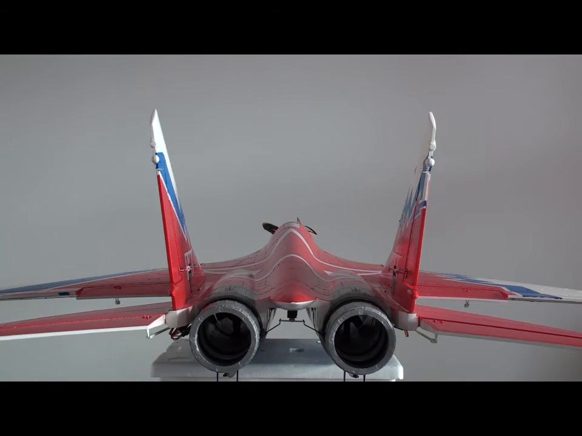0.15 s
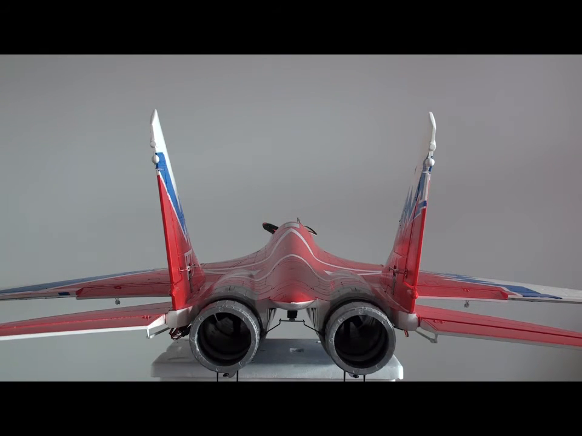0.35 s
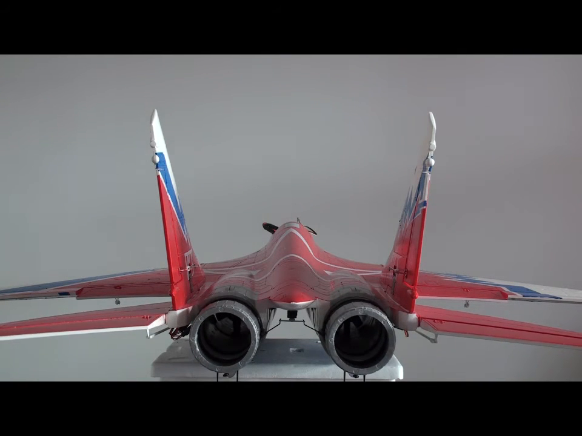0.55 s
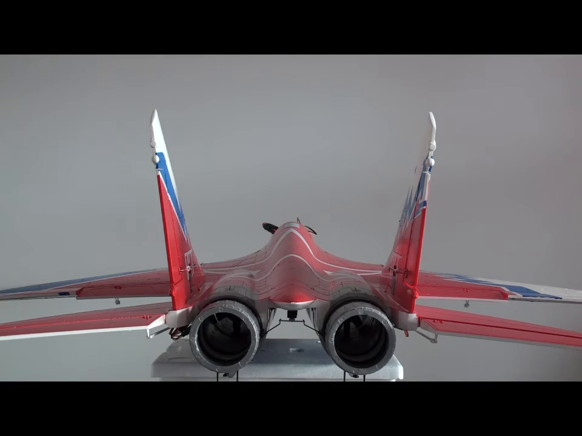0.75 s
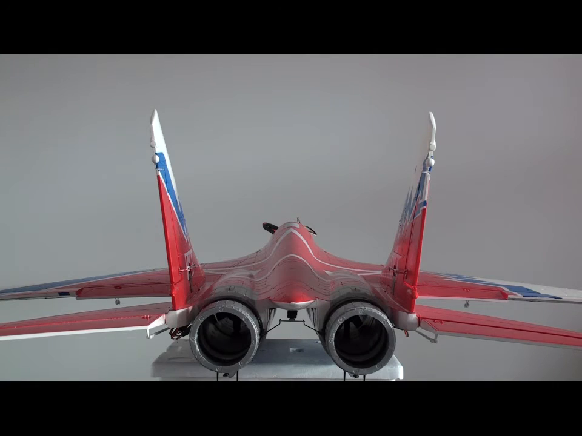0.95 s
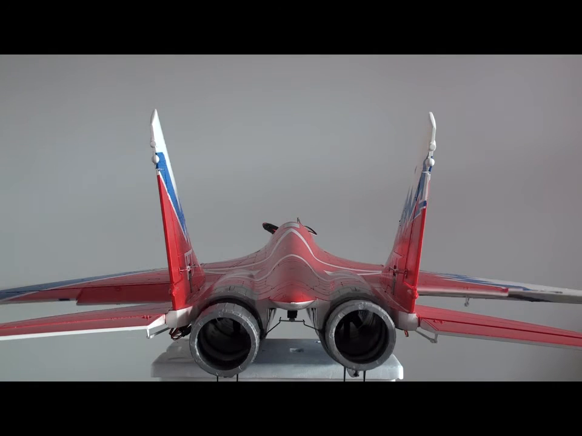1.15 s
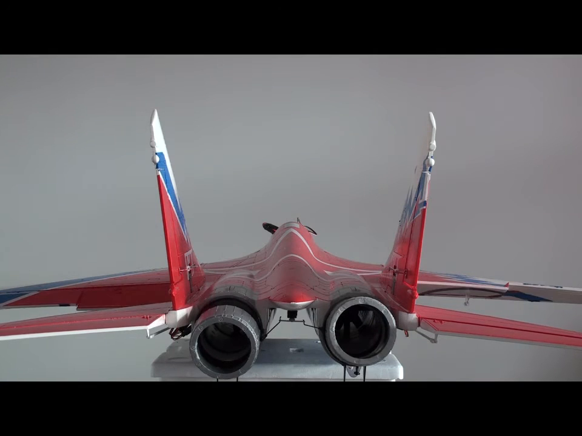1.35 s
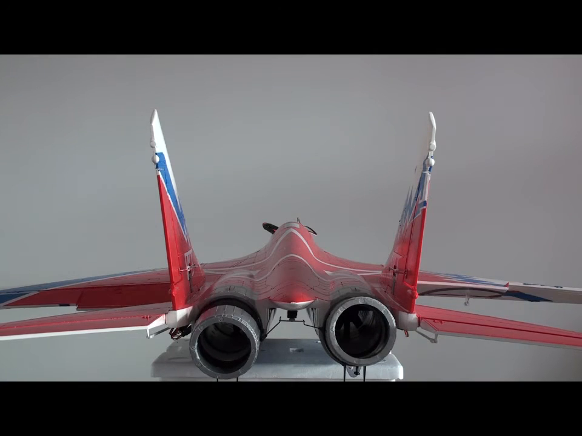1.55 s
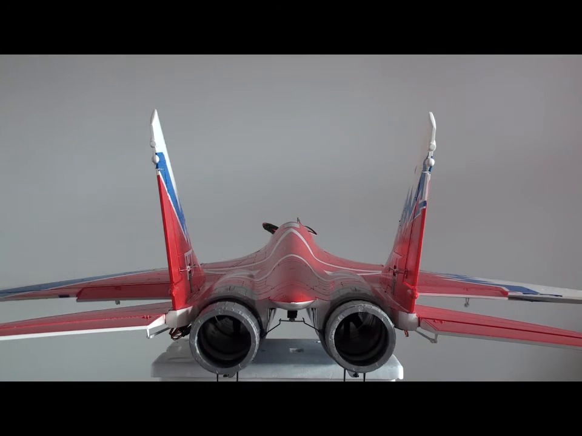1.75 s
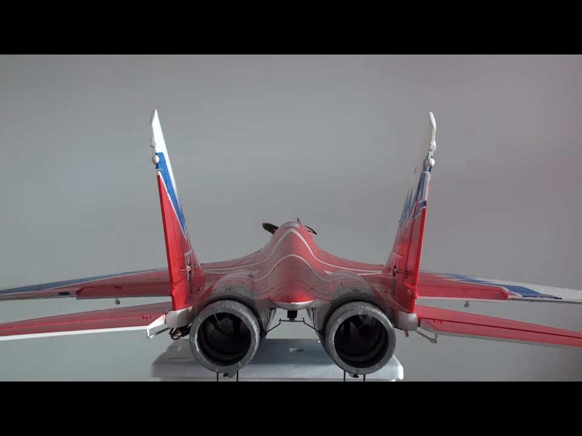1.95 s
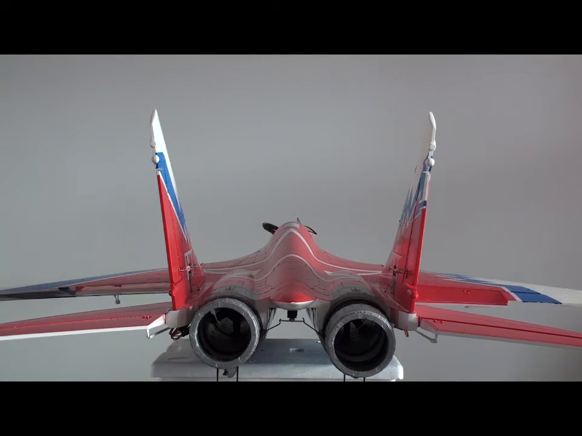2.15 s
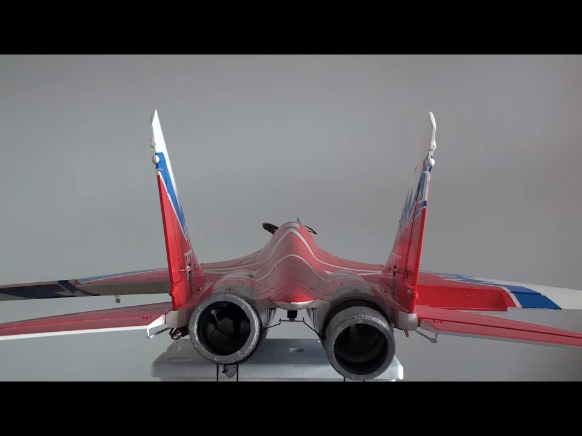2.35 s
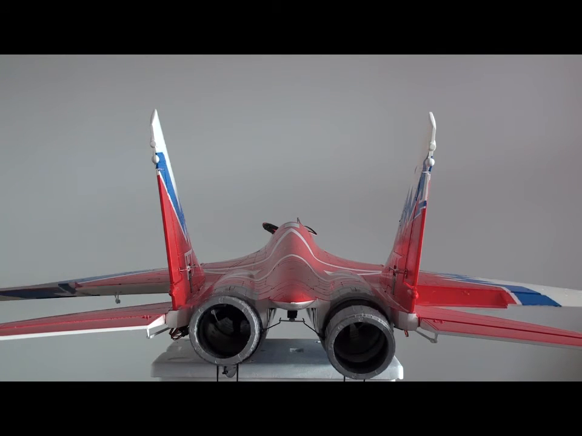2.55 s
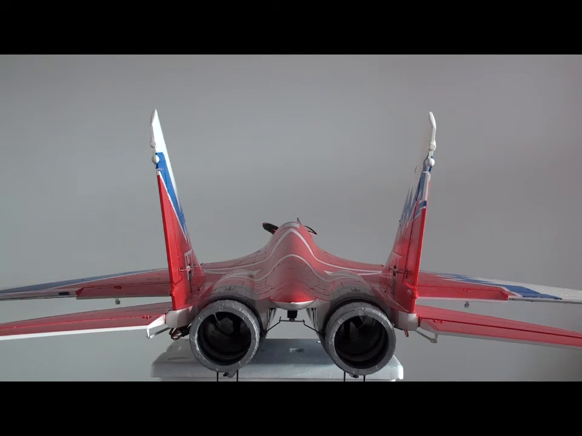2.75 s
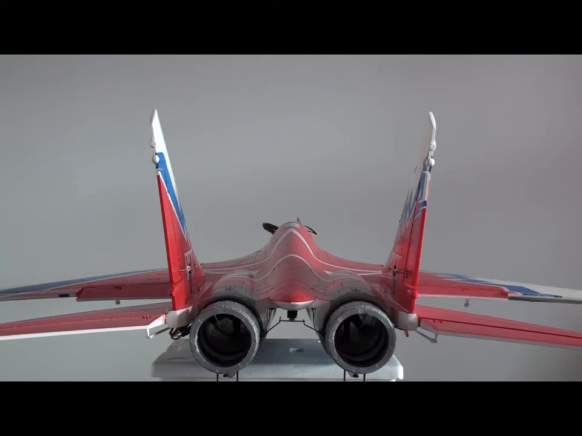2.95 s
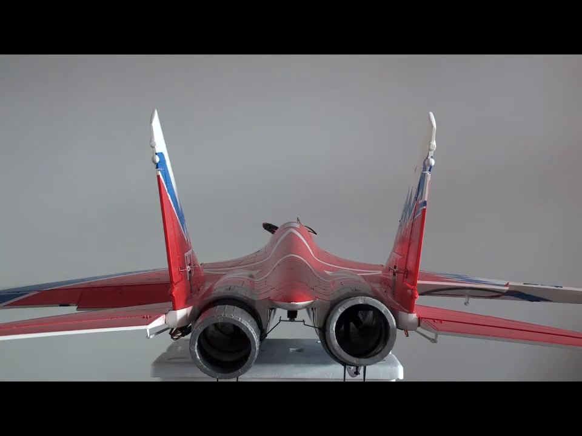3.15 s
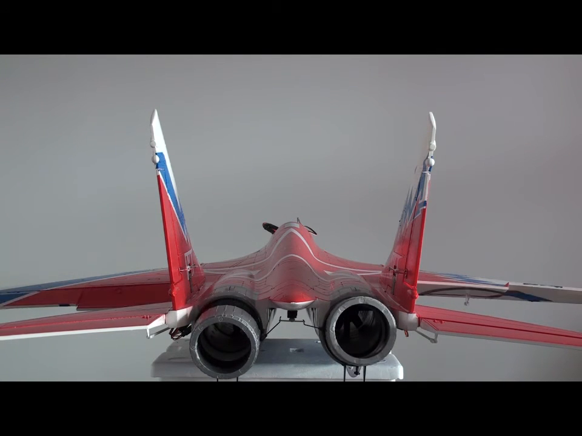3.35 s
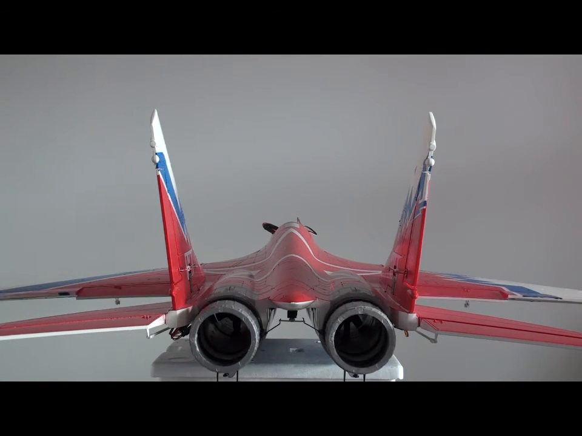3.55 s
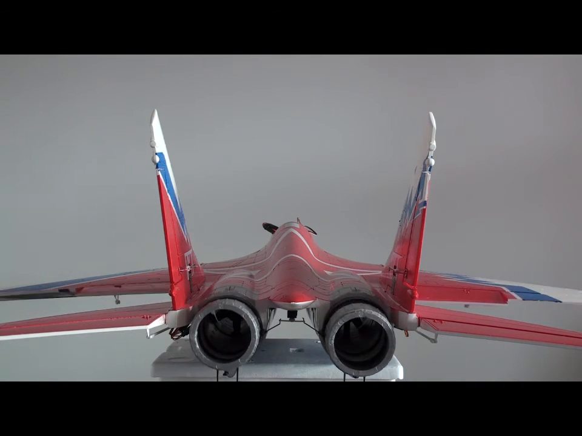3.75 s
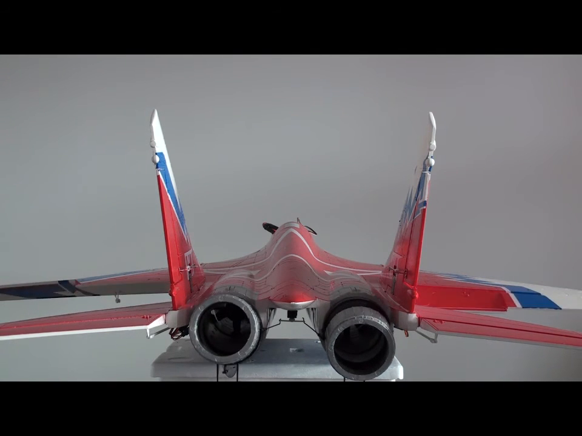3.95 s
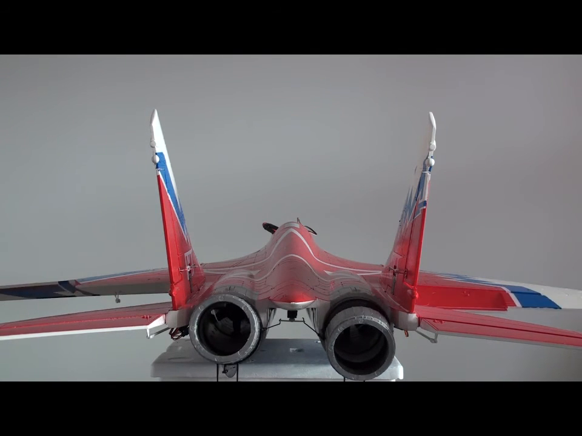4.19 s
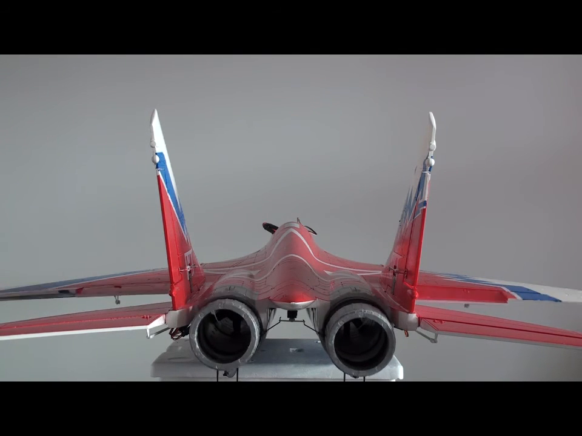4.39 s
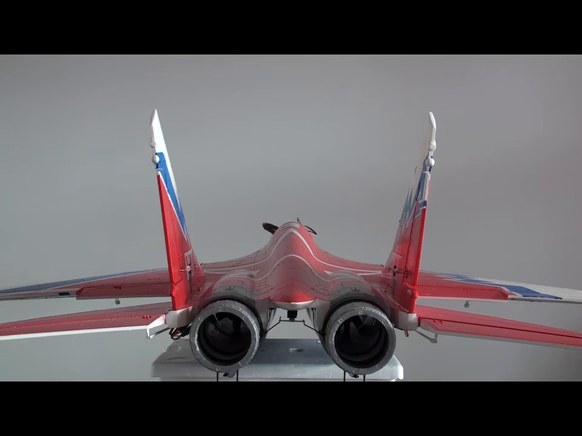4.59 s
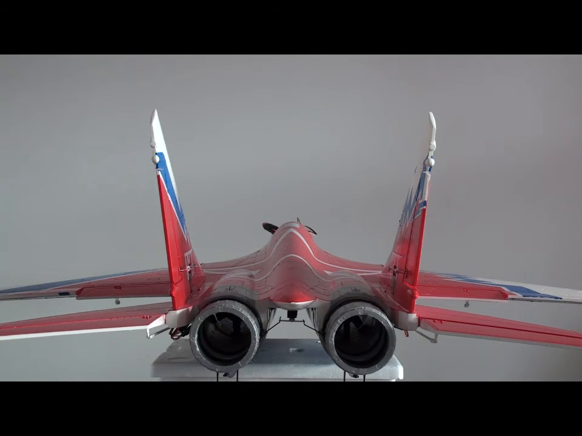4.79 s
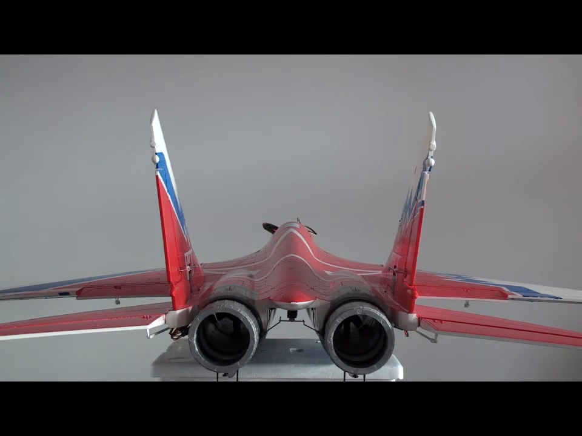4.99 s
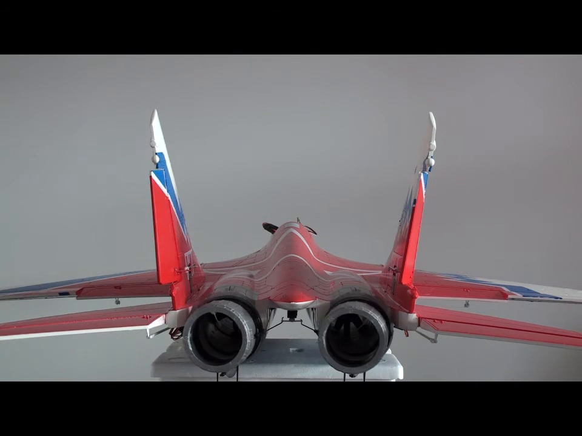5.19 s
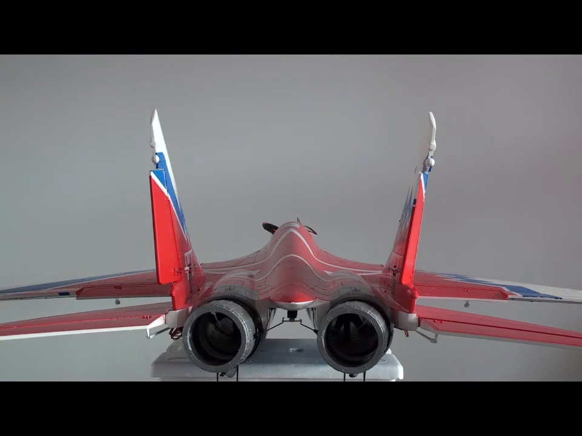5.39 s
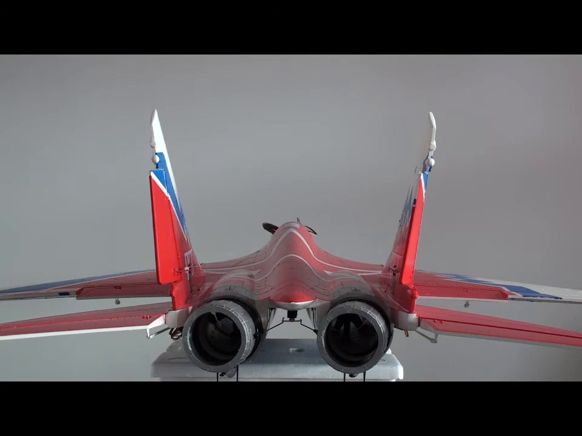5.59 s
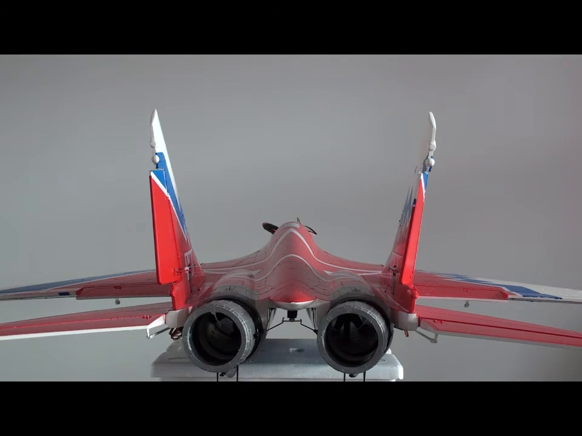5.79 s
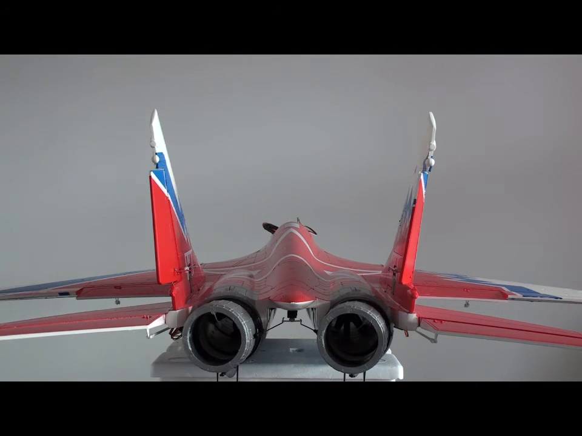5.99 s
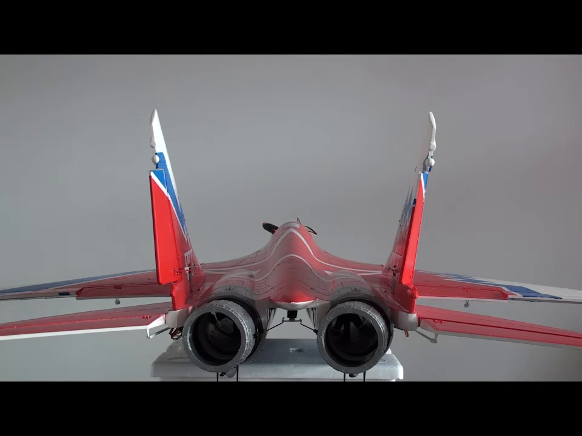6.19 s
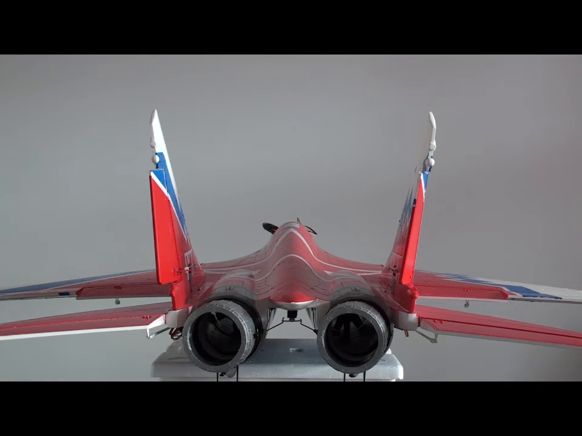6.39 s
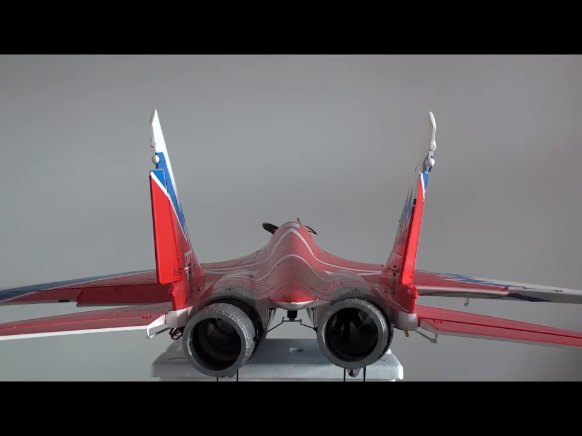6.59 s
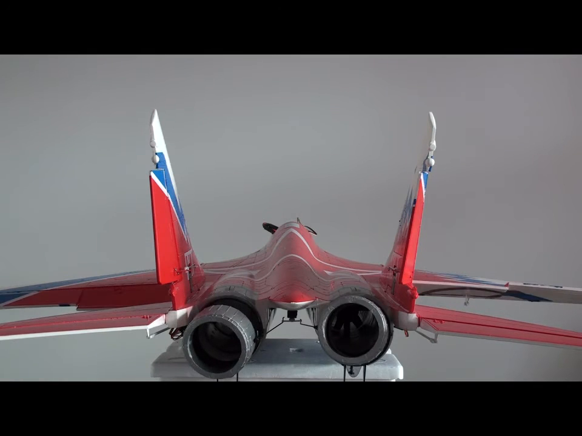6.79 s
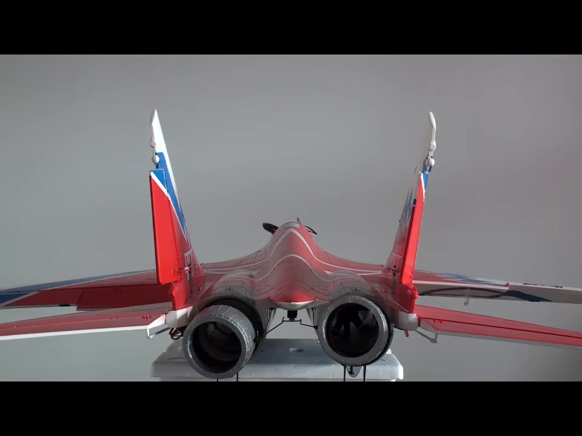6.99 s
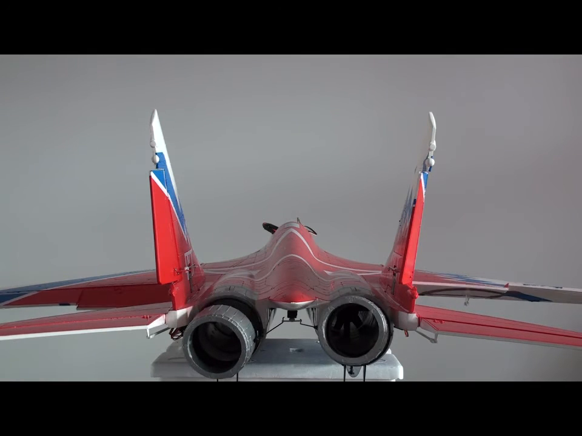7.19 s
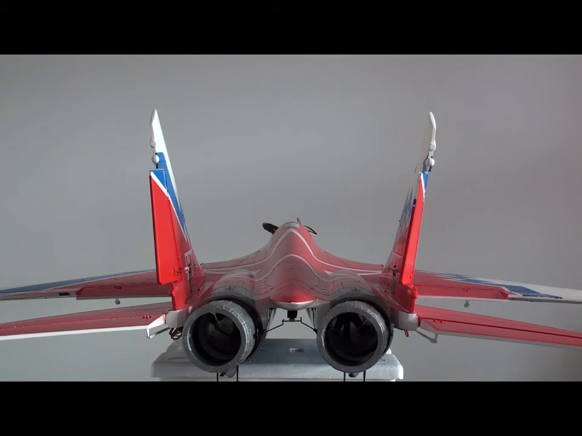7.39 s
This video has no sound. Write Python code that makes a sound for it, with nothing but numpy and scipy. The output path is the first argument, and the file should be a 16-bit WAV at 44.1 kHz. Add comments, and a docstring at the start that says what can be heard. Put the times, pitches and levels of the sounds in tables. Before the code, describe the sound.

The servos of a model jet are heard close and centered in a small room, with a short echo and faint background noise. For the first second they give a soft, crackly buzz that stops and starts, with tiny gear ticks. From about 1.1 to 4.7 seconds they whir in a dozen or so short, raspy strokes as the control surfaces swing. Each opens with a light tick, swells and quickly fades; the strongest come near 1.4, 3.2 and 3.6 seconds. The faint buzz continues in the gaps. Around 5 seconds the rudders twitch twice, then swing with a softer whir, and the hollow tail gives three faint, dull knocks. From about 5.4 to 6.5 seconds only the fitful buzz and a few ticks remain. Two strong whirs run together from 6.6 to 6.9 seconds, followed by more buzzing and a last short stroke with a click near 7.4 seconds.

```python
"""In a small room, the servos of a model jet buzz in fits as they hold its surfaces against their weight.
Loaded gears tick in their play. From about 1 s the tail planes, ailerons and nozzles swing: each stroke
opens with a tick of backlash, then a rush of gear-tooth impacts excites the hollow airframe's resonances.
Near 5 s the rudders twitch, jerk and swing, and the tail answers with dull knocks.
The holding buzz returns, broken by three last strokes."""
import sys
import numpy as np
from scipy import signal
from scipy.fft import rfft, irfft, next_fast_len
from scipy.io import wavfile

SR = 44100
rng = np.random.default_rng(int(sys.argv[2]) if len(sys.argv) > 2 else 0)


def to_wav(s):
    """Save 16-bit WAV."""
    ch = np.atleast_2d(s).T  # columns
    pcm = np.round(np.clip(ch, -1, 1) * 32767)  # PCM
    wavfile.write(sys.argv[1], SR, pcm.astype(np.int16))


N = 328104
TIME = np.arange(N) / SR


def from_db(db):
    """Amplitude grows tenfold for every 20 dB."""
    return 10 ** (np.asarray(db) / 20)


def rms_one(x):
    """Normalisation to unit mean power."""
    return x / np.sqrt(np.mean(x ** 2) + 1e-20)


def drift(rate_hz):
    """Low-passed Gaussian noise: a smooth fluctuation of unit rms."""
    step, settle = 40, 2000
    pole = np.exp(-2 * np.pi * step * rate_hz / SR)
    noise = rng.standard_normal(N // step + settle + 2)
    slow = signal.lfilter([1], [1, -2 * pole, pole * pole], noise)[settle:]
    return np.interp(np.arange(N) / step, np.arange(len(slow)), rms_one(slow))


def colour(x, points):
    """Zero-phase filtering by a curve of (frequency [Hz], gain [dB])."""
    size = next_fast_len(N + SR // 10)
    hz, db = np.transpose(points)
    bins = np.maximum(np.fft.rfftfreq(size, 1 / SR), 1)
    gain = from_db(np.interp(np.log(bins), np.log(hz), db))
    return irfft(rfft(x, size) * gain, size)[..., :N]


def cut(x, hz, kind, order=4):
    """Butterworth filtering: a maximally flat passband."""
    return signal.sosfilt(signal.butter(order, hz, kind, fs=SR, output="sos"), x)


def resonate(x, peaks):
    """Resonance: each mode scales its own band, and rings longer the narrower it is."""
    out = x
    for hz, width_hz, gain_db in peaks:
        radius = np.exp(-np.pi * width_hz / SR)
        poles = [1, -2 * radius * np.cos(2 * np.pi * hz / SR), radius ** 2]
        band = signal.lfilter(np.array([1, 0, -1]) * (1 - radius ** 2) / 2, poles, x + 1e-18)
        out = out + (from_db(gain_db) - 1) * band
    return out


def decay(impulses, ring_s):
    """Damping: each impulse dies away exponentially."""
    return signal.lfilter([1], [1, -np.exp(-1 / (ring_s * SR))], impulses + 1e-18)


def contacts(rate_hz, uneven_db, chance_db, teeth):
    """Gear meshing: one impact per tooth, in a pattern of strengths that recurs with each turn."""
    phase = np.cumsum(rate_hz) / SR + rng.random()
    tooth = phase.astype(int)
    at = np.flatnonzero(np.diff(tooth))
    tooth_db = uneven_db * rng.standard_normal(teeth)[tooth[at] % teeth]
    scatter_db = chance_db * np.clip(rng.standard_normal(len(at)), -2, 2)
    strength = rms_one(from_db(tooth_db + scatter_db)) / np.sqrt(rate_hz[at] / SR)
    late = (tooth[at + 1] - phase[at]) / (phase[at + 1] - phase[at])   # fraction of a sample
    out = np.zeros(N)
    out[at] += strength * (1 - late)
    out[at + 1] += strength * late
    return out


def rattle(clicks, ring_s):
    """Chatter of loose teeth: the energy of each impact decays as noise."""
    return rms_one(np.sqrt(decay(clicks ** 2, ring_s)) * rng.standard_normal(N))


def shell_path(bounce=0.66, stages=3, size=4096):
    """Allpass dispersion: short echoes in the shell smear a click without colouring it."""
    response = 1
    for lag in rng.integers(20, 170, stages):
        delay = np.exp(-2j * np.pi * np.fft.rfftfreq(size) * lag)
        response = response * (delay - bounce) / (1 - bounce * delay)
    return irfft(response)


def airframe(x, side_lag_s=.002):
    """Multipath transmission through the shell: one path to the mid, a later one to the side."""
    ahead = signal.oaconvolve(x, shell_path())[:N]
    sideways = signal.oaconvolve(np.roll(x, round(side_lag_s * SR)), shell_path())[:N]
    return rms_one(np.array([ahead, sideways]))


# Fits of holding buzz: (time [s], duration [s], level [dB])
BUZZ_FITS = [(0, .15, -49), (.227, 0.064, -50), (0.338, 0.2, -49), (.577, 0.23, -51), (0.824, .045, -48.5),
             (.92, 0.022, -53), (0.998, 0.058, -50), (1.44, .2, -49), (2.055, .05, -46),
             (2.546, 0.091, -52), (3.41, .1, -49.5), (4.193, 0.087, -48.5), (4.666, 0.099, -53),
             (4.794, 0.17, -49), (5.385, 0.072, -51), (5.505, 0.1, -48.5), (5.693, 0.19, -49.5),
             (5.938, .173, -48), (6.142, 0.087, -49), (6.301, .255, -50), (6.902, .14, -49.5),
             (7.075, 0.22, -51)]
# Spectral envelope of the stalled gears: (frequency [Hz], gain [dB])
BUZZ_SPECTRUM = [(150, -23), (250, -11), (550, -9.5), (800, -4.5), (1750, -4.5), (2200, -2), (3600, -5.5),
                 (5600, -7), (6400, -13.5), (8700, -16.5), (9600, -41), (16000, -47)]
# Case and airframe modes under the buzz: (frequency [Hz], bandwidth [Hz], gain [dB])
BUZZ_MODES = [(2160, 37, 4.6), (2240, 50, 7.6), (2430, 34, 5.8), (3000, 160, 5.1), (2960, 130, 2.1),
              (3700, 140, 6.2), (4430, 29, 9.1), (5080, 44, 5.2), (5340, 73, 7.1), (5880, 80, 6),
              (7340, 340, 5.2), (8800, 165.8, 3.19)]
# Spectral envelope of a tooth's snap or tick: (frequency [Hz], gain [dB])
TICK_SPECTRUM = [(300, -13), (900, -15), (2500, 12), (4500, 7.5), (8000, -2), (11500, -6), (16000, -17)]


def holding_buzz(pulse_hz=357.2, snaps_per_s=110, snap_db=-7, rise_s=0.0042, fall_db_per_s=280):
    """Forced vibration: drive pulses jog stalled gears in their play, and teeth snap over at random."""
    envelope_db = np.full(N, -120.)
    for start, length_s, db in BUZZ_FITS:
        span = slice(round(start * SR), round((start + length_s + .5) * SR))
        age = np.maximum(TIME[span] - start, 0)
        fit_db = db - 5 * np.exp(-age / rise_s) - fall_db_per_s * np.maximum(age - length_s, 0)
        envelope_db[span] = np.maximum(envelope_db[span], fit_db)
    buzz = 0
    for share in np.geomspace(.7, 1, 4):   # four servos, each at its own rate
        rate_hz = pulse_hz * share * np.exp(.06 * drift(14))
        jogs = contacts(rate_hz, uneven_db=1.5, chance_db=6.5, teeth=3)
        buzz = buzz + airframe(rms_one(jogs) + 1.37 * rattle(jogs, ring_s=0.00066))
    buzz = rms_one(resonate(colour(buzz, BUZZ_SPECTRUM), BUZZ_MODES))
    slips = (rng.random(N) < snaps_per_s / SR) * from_db(1.3 * np.clip(rng.standard_normal(N), -2, 2))
    snaps = rms_one(colour(airframe(rattle(slips, ring_s=0.0038)), TICK_SPECTRUM))
    return from_db(envelope_db) * (buzz + from_db(snap_db) * snaps)


# Spectral envelope of the room's background: (frequency [Hz], gain [dB])
AMBIENT_SPECTRUM = [(15, -42), (25, -10), (59, -0.5), (114, -6.5), (624, -5), (840, -4), (1610, -6.5),
                    (2160, -4.5), (2690, -10.5), (2990, -1), (3430, -6.5), (5430, -15.5), (16000, -28)]


def room_tone(level_db=-55.5):
    """Stationary noise: a faint background, uncorrelated between mid and side."""
    noise = colour(rng.standard_normal((2, N)), AMBIENT_SPECTRUM)
    return from_db(level_db) * rms_one(cut(noise, 29, "high", order=2))


# Gears slipping under load: (time [s], relative level [dB], treble offset [dB])
GEAR_SLIPS = [(.775, -42, -4), (.843, -43, -6), (1.126, -25, -31), (1.183, -27, -4), (1.191, -35, -23),
              (2.4877, -20, -38), (3.0431, -27, -30), (3.061, -33, 0), (4.259, -22, -22), (4.949, -30, -4),
              (5.0084, -33, 5), (5.551, -32, -9), (5.6095, -41, -34), (6.143, -39, -7), (6.3, -29, -14),
              (7.3241, -31, -10), (7.37, -15, -16)]


def backlash(ring_s=0.0042, body_db=-12.5, bright_db=2.0, crossover_hz=7000):
    """Impact across a clearance: gears tick as they slip and as each stroke takes up the slack."""
    starts = [(stroke[0], -29.5, -10.5) for stroke in SURFACE_STROKES + RUDDER_STROKES]   # as GEAR_SLIPS
    body, treble = np.zeros((2, N))
    for time_s, db, treble_db in starts + GEAR_SLIPS:
        body[round(time_s * SR)] = from_db(db + body_db)
        treble[round(time_s * SR)] = from_db(db + treble_db + bright_db)
    crack = rms_one(colour(rng.standard_normal((2, N)), TICK_SPECTRUM))
    return (cut(decay(body, ring_s) * crack, crossover_hz, "low")
            + cut(decay(treble, ring_s) * crack, crossover_hz, "high"))


def stroke_envelopes(strokes, usual_db=-33, attack_s=.003, bite_s=0.026):
    """Brightness rises with speed: through run-up, cruise and slowing, rasp varies most, growl least."""
    gains = np.zeros((3, N))
    for start, run_up_s, cruise_s, fall_db_per_s, start_db, top_db, extra_growl_db, slack_s in strokes:
        age = np.maximum(TIME - start, 0)
        slowed_db = fall_db_per_s * np.maximum(age - run_up_s - cruise_s, 0)
        whirr_db = start_db + (top_db - start_db) * np.minimum(age / run_up_s, 1) - slowed_db - usual_db
        # The airframe growls less while the linkage is slack, and briefly more as the load bites.
        slack = np.clip((slack_s - age) / attack_s, 0, 1)
        bite = (0 < slack_s) * (age > slack_s) * np.exp(-np.abs(age - slack_s) / bite_s)
        growl_db = 0.64 * whirr_db + extra_growl_db - 4 * slack + 3.5 * bite
        rasp_db = 1.63 * whirr_db - 0.41 * slowed_db
        attack = np.minimum(age / attack_s, 1)
        gains = np.maximum(gains, attack * from_db([growl_db, whirr_db, rasp_db]))
    return from_db(usual_db) * gains


def gear_trains(strokes, spectrum, modes, servos, mesh_hz, looseness, growl_db, whirr_db, rasp_db):
    """Source and filter: tooth impacts, denser and louder with speed, excite the cases and airframe."""
    crawl_db, command_hz, whirr_band_hz = -48, 45.4, (1500, 8000)
    growl, whirr, rasp = stroke_envelopes(strokes)
    speed = (np.maximum(whirr, from_db(crawl_db)) / whirr.max()) ** .22
    impacts = 0
    for share in np.geomspace(.7, 1, servos):
        rate_hz = mesh_hz * share * speed * np.exp(.035 * drift(12))
        pinion = contacts(rate_hz, uneven_db=9.5, chance_db=3.5, teeth=11)
        wheel = contacts(rate_hz / 4.3, uneven_db=1.5, chance_db=2.0, teeth=13)
        clicks = pinion + 0.79 * wheel
        clean = rms_one(cut(clicks, 174, "high", order=2))
        chatter = rattle(clicks, ring_s=0.00048)
        impacts = impacts + airframe(np.sqrt(1 - looseness) * clean + np.sqrt(looseness) * chatter)
    surge = from_db(0.71 * np.sin(2 * np.pi * command_hz * TIME))   # each receiver command gives a push
    body = resonate(colour(impacts * surge, spectrum), modes)
    flicker_db = 1.24 * drift(45)   # the teeth catch unevenly
    return (growl * from_db(growl_db) * rms_one(cut(body, whirr_band_hz[0], "low"))
            + whirr * from_db(whirr_db) * rms_one(cut(body, whirr_band_hz, "band"))
            + rasp * from_db(rasp_db + flicker_db) * rms_one(cut(body, whirr_band_hz[1], "high")))


# Strokes of the tail planes, ailerons and nozzles: (time [s], run-up [s], cruise [s], decay rate [dB/s],
# relative start level [dB], relative top level [dB], extra growl [dB], slack time [s])
SURFACE_STROKES = [ (1.116, 0.24, 0.0074, 235, -42, -24.5, -2, 0.05),
                   (1.754, .05, .068, 158, -45.5, -27.5, -0.5, .02),
                   (1.955, 0.021, .012, 95, -39, -36, -3, 0.017),
                   (2.112, 0.31, 0.0051, 145, -40.5, -28.5, 2.5, 0.5),
                   (2.633, .04, .027, 98.5, -38.5, -29.5, -2.5, .01),
                   (2.76, 0.043, 0.0065, 91, -34.5, -29, -0.5, 0),
                   (2.986, .019, 0.088, 148, -39, -39.5, 2, 0),
                   (3.094, 0.15, 0.0041, 175, -36, -23.5, -1.5, 0.0091),
                   (3.513, 0.01, .02, 150, -42.5, -40, -2.5, 0.0096),
                   (3.538, .025, .042, 135.5, -32, -24, 1.5, 0),
                   (3.77, 0.13, 0.13, 147, -39.5, -31.5, 0, 0.012),
                   (4.03, 0.036, .008, 125, -32.5, -28.5, -1, 0),
                   (4.258, 0.18, 0.092, 123, -40.5, -29.5, 3, 0.5),
                   (6.55, 0.13, 0.03, 166, -44.5, -29, -1.5, 0.084),
                   (6.72, 0.068, .013, 246, -29.5, -24.5, -4, 0),
                   (7.317, .033, .1, 150, -41, -31, -3, 0.017), ]
# Spectral envelope of their gears: (frequency [Hz], gain [dB])
SURFACE_SPECTRUM = [(70, -56), (130, -24), (230, -10), (400, -12.5), (620, -9), (900, -7.5), (1150, -4),
                    (1480, -6), (2000, 1.5), (3700, 8), (5400, 5.5), (7500, -4), (9500, -10),
                    (11500, -13.5), (16000, -30.5)]
# Their case and airframe modes: (frequency [Hz], bandwidth [Hz], gain [dB])
SURFACE_MODES = [(245, 20, -1.5), (474, 11, 7), (540, 25, 7), (681, 50, 8.5), (743, 27, 8.5), (1880, 13, 4),
                 (3580, 22, 3), (3800, 37, 4.5), (4460, 13, 4.5), (4936, 15, 7), (5593, 26, 6),
                 (7340, 60, 4.5), (8150, 31, 5.5), (11430, 18, 8)]


def surface_servos():
    """Gear-mesh noise: four servos swing the tail planes, ailerons and nozzles."""
    return gear_trains(SURFACE_STROKES, SURFACE_SPECTRUM, SURFACE_MODES, servos=4, mesh_hz=2403.4,
                       looseness=0.84, growl_db=-10.0, whirr_db=-3.0, rasp_db=-9.0)


# Twitch, jerk and full swing of the rudders: columns as in SURFACE_STROKES
RUDDER_STROKES = [ (4.945, 0.0057, .014, 151, -41, -41, -3, 0), (5.003, .006, .012, 89.7, -41, -40.5, 5, 0),
                  (5.08, .175, .05, 195, -43, -32.5, 0, 0), ]
# Spectral envelope of their gears: (frequency [Hz], gain [dB])
RUDDER_SPECTRUM = [(90, -52), (160, -15), (250, -13), (420, -16), (650, -13), (1500, -8), (3200, 8.5),
                   (5500, 6), (8400, -8.5), (9600, -12.5), (11500, -14), (16000, -32)]
# Their case and airframe modes: (frequency [Hz], bandwidth [Hz], gain [dB])
RUDDER_MODES = [(870, 36, 4.2), (2970, 39, 2.8), (4500, 62, 5), (7500, 90, 3.6), (7800, 220, 7.1),
                (8400, 430, 7.1)]


def rudder_servos():
    """Gear-mesh noise at a lower tooth rate: two servos swing the rudders."""
    return gear_trains(RUDDER_STROKES, RUDDER_SPECTRUM, RUDDER_MODES, servos=2, mesh_hz=1307,
                       looseness=0.82, growl_db=-13.5, whirr_db=-3.5, rasp_db=-6.5)


# Dull knocks of the tail: (time [s], frequency [Hz], level [dB], 60 dB decay time [s])
TAIL_KNOCKS = [(5.005, 354, -48, 0.2255), (5.297, 224, -48, 0.32), (5.345, 259, -46.5, 0.2)]


def tail_knocks(rise_s=0.00873):
    """Damped free vibration: the hollow tail rings softly as the rudders start and stop."""
    out = 0
    for time_s, hz, db, t60_s in TAIL_KNOCKS:
        age = np.maximum(TIME - time_s, 0)
        envelope = from_db(db - 60 * np.minimum(age / t60_s, 2)) * (1 - np.exp(-age / rise_s))
        out = out + envelope * np.sin(2 * np.pi * hz * age)
    return out


def echoes(t60_s):
    """A diffuse field: dense reflections of unit total energy decay exponentially."""
    age = np.arange(int(t60_s * SR)) / SR
    tail = rng.standard_normal(len(age)) * from_db(-60 * age / t60_s) * (age > .001)
    return tail / np.sqrt(np.sum(tail ** 2))


def room(x, t60_s=0.34, mid_db=-11, side_db=-7, band_hz=(600, 9000)):
    """Reverberation: the walls add a short, duller tail to mid and side; the bass leaks away."""
    responses = [cut(echoes(t60_s), band_hz, "band", order=1) for _ in range(2)]
    tails = [signal.oaconvolve(x[0], response)[:N] for response in responses]
    return x + from_db([[mid_db], [side_db]]) * tails


# Stereo width: (frequency [Hz], relative side gain [dB])
SIDE_SPECTRUM = [(60, -29), (110, -1.5), (200, -9.5), (380, -5), (700, -9.5), (1290, -8.5), (2380, -11.5),
                 (4400, -11.5), (8120, -14), (15000, -5)]


def scene():
    """Superposition in mid and side: the jet is central; reflections and room tone give a little width."""
    jet = surface_servos() + rudder_servos() + holding_buzz() + backlash()
    mid, side = room(jet) + room_tone()
    mid = mid + tail_knocks()
    side = from_db(0.5) * colour(side, SIDE_SPECTRUM)
    return np.array([mid + side, mid - side])


def record(dry, cutoff_hz=15900):
    """Band limiting: an elliptic low-pass cuts the top steeply."""
    return signal.sosfilt(signal.ellip(12, .1, 80, cutoff_hz, fs=SR, output="sos"), dry)


dry = scene()
out = record(dry)
to_wav(out)
```